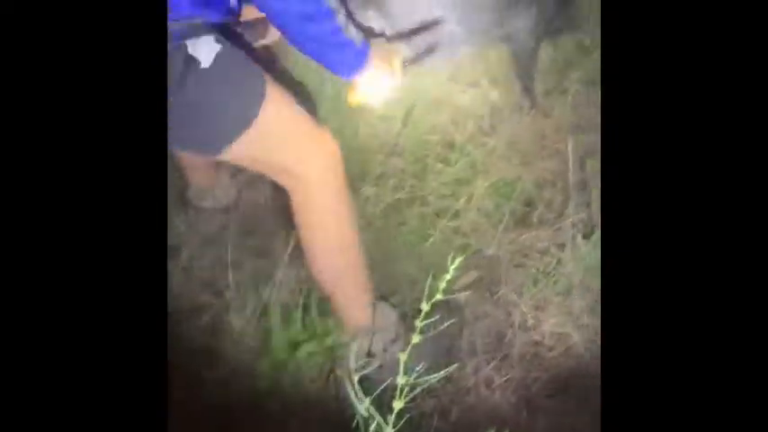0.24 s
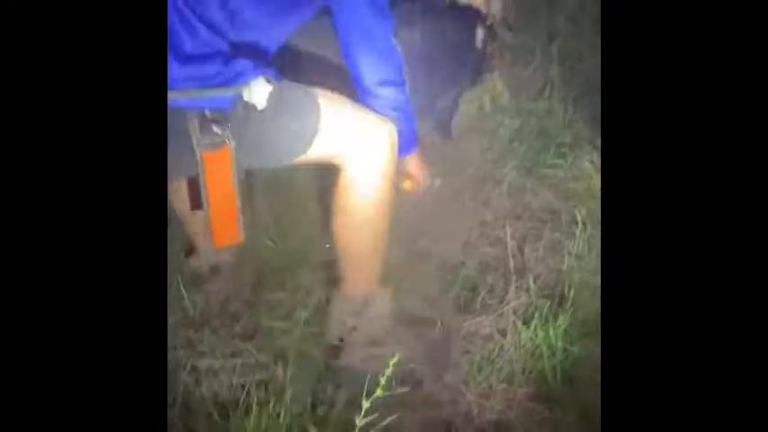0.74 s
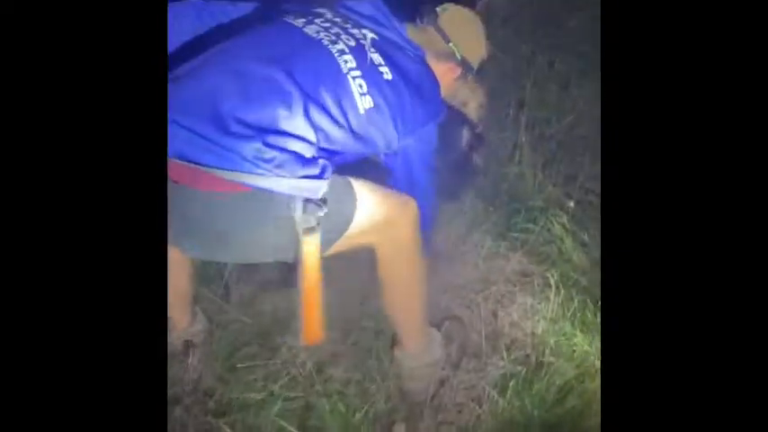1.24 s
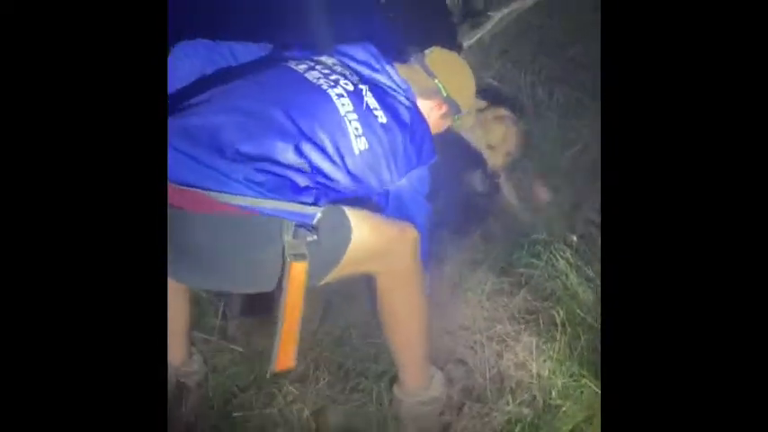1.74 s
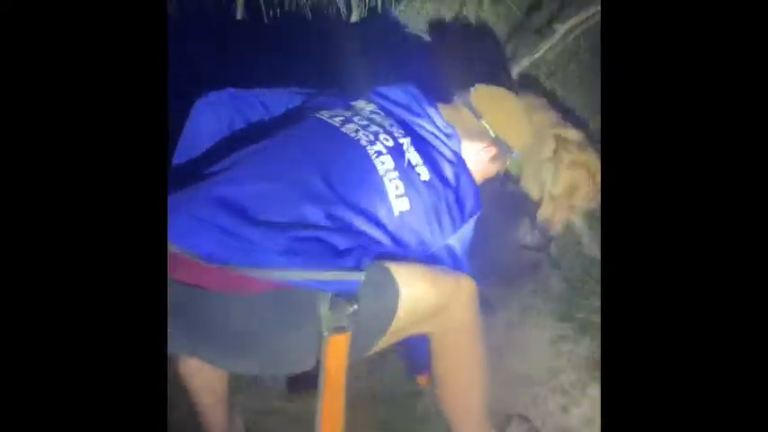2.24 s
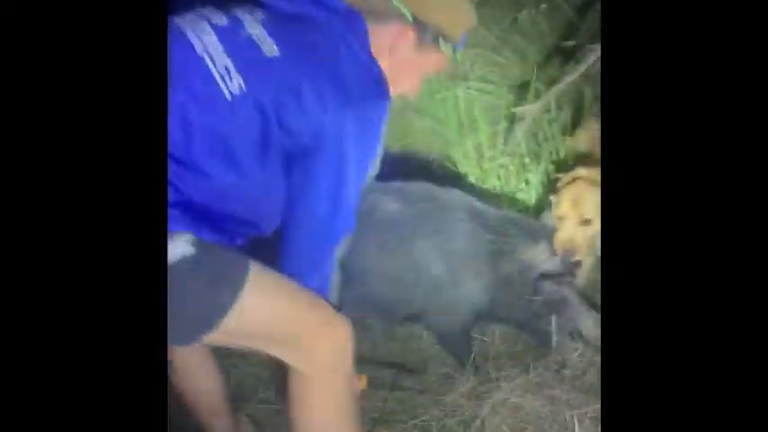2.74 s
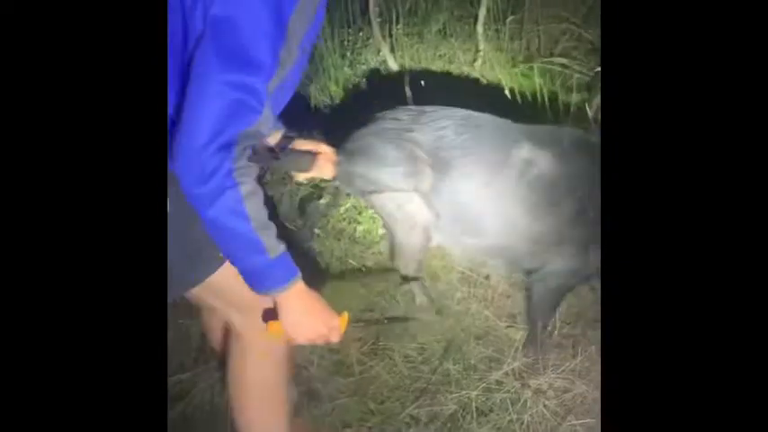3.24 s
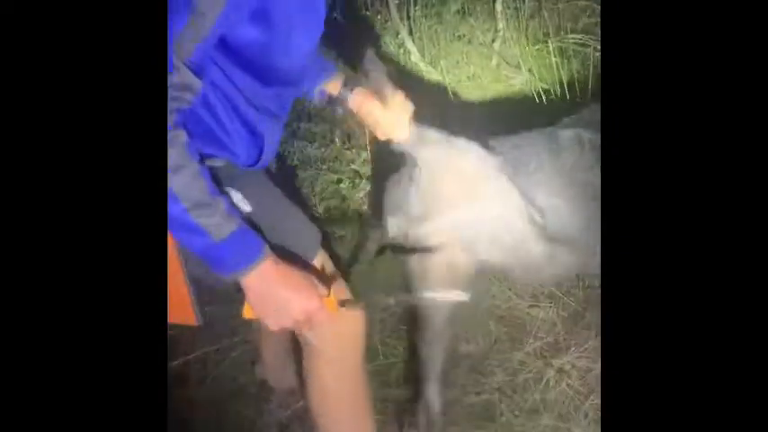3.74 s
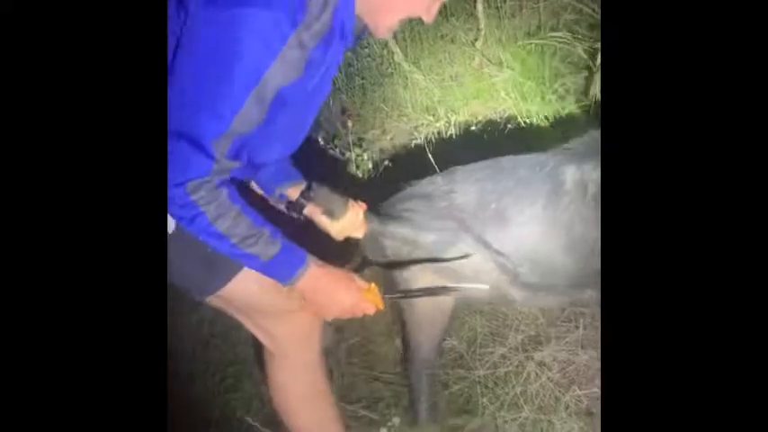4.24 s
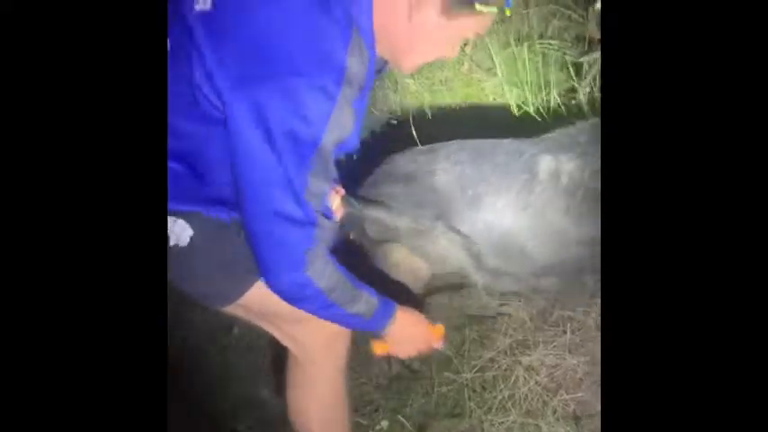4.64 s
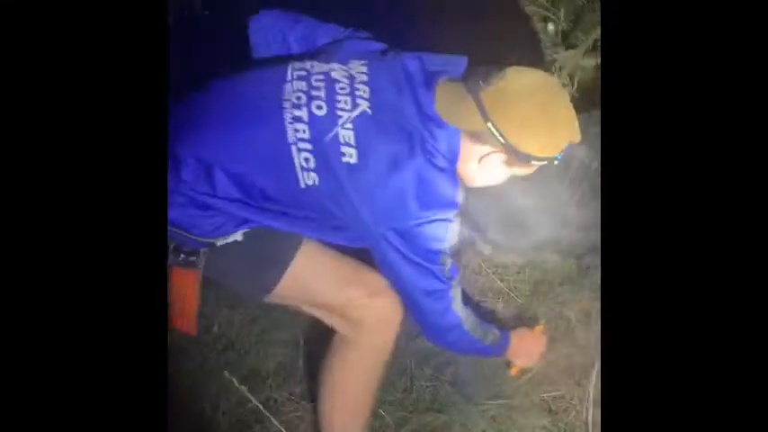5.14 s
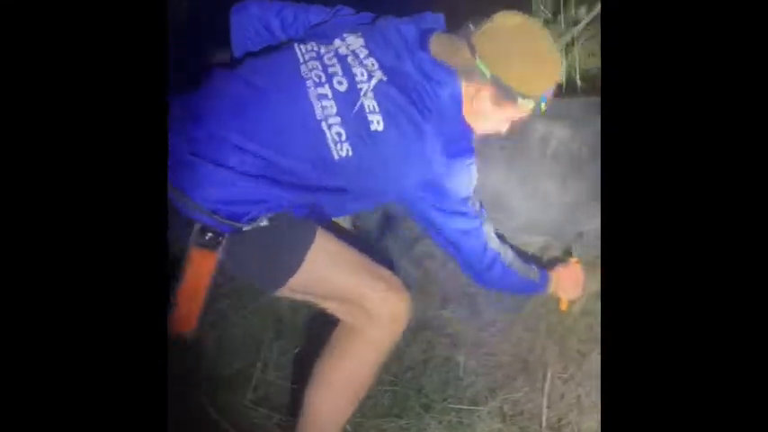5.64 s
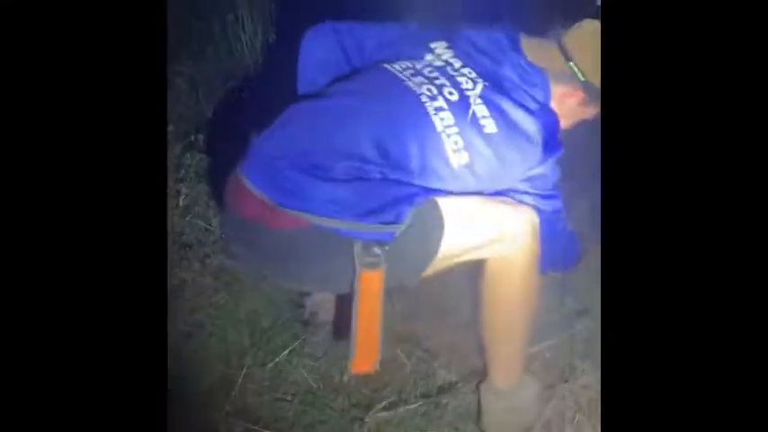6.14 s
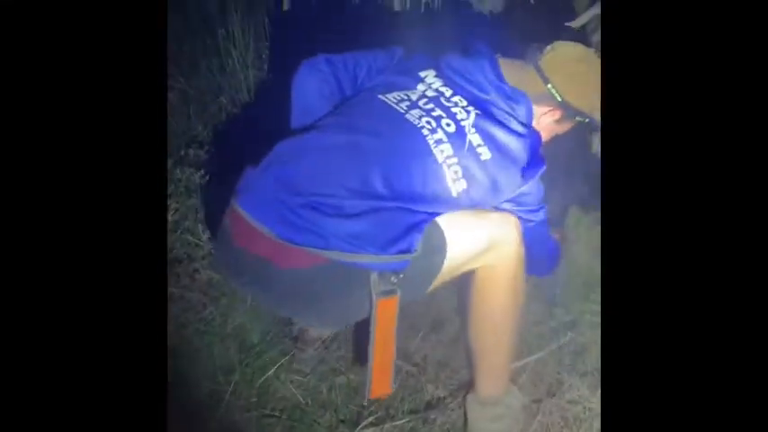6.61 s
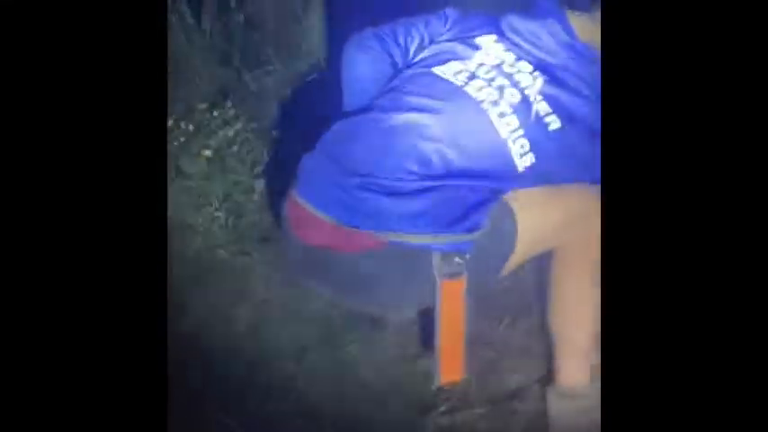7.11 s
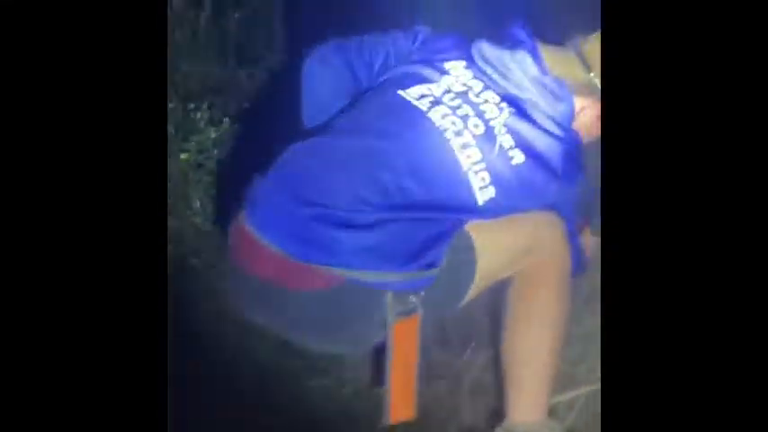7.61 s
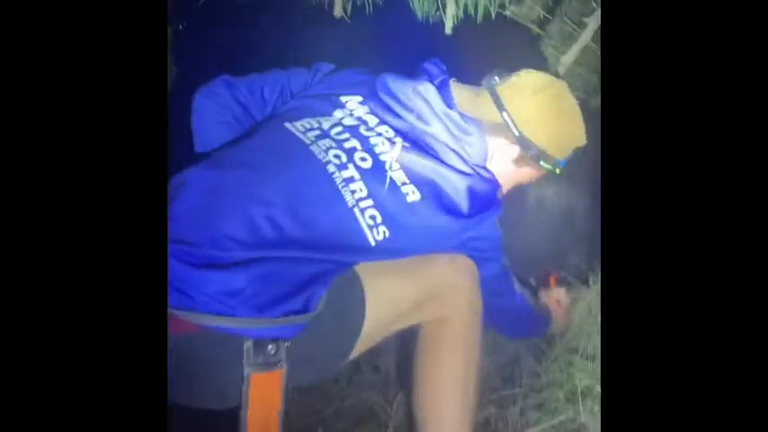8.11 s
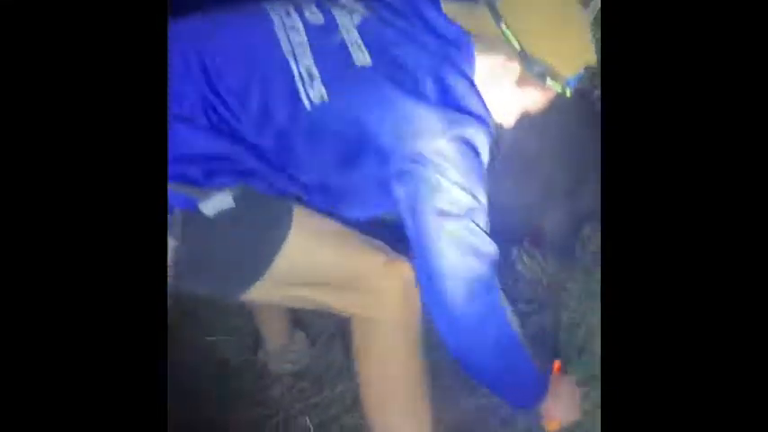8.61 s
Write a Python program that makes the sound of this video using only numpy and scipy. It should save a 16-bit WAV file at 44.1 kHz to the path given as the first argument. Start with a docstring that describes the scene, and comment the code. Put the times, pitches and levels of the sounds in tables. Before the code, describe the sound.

Close, dry outdoor sound on a still night, with a very faint hush behind. From 0 to 2.4 s a wild pig grunts in irregular quick runs, each grunt a few hard throat flaps, with slack rattles, raspy air and low rumble around them; a thin rising moan slips in near 0.8 s. At 2.45 s it breaks into a rough, whistling scream of about 0.6 s, dipping and climbing, ending in a short yelp near 3.15 s. Grunts resume from 3.3 to 5.4 s, with small moans at 3.75 and 4.6 s and faint dry stalk snaps at 4.4 and 5.1 s. A long scream runs 5.4 to 7.7 s, growling at first, then high, piercing and torn, over faint dull thumps, dropping suddenly in pitch at the end. A soft breath hiss follows, then grunts at 8.0, 8.2, 8.4 and 8.8 s, with another hiss near 8.7 s.

```python
"""Runs of rattling grunts from a wild pig, held by a dog in a paddock at night, a few steps away.
Slow flaps of the vocal folds ring its throat; slack folds rattle between and after the grunts.
Twice it breaks into a scream, the first ending in a yelp: a high whistle riding on fast, rough fold pulses.
Air rasps and rumbles with the grunts. Thin moans, soft hisses, dull thumps and snapping stalks
stand over the hush of a still night, made of shaped noise. The dog itself makes no sound."""
import sys
import numpy as np
from scipy import signal
from scipy.fft import rfft, irfft, next_fast_len
from scipy.io import wavfile
from scipy.ndimage import uniform_filter1d

SR = 44100
rng = np.random.default_rng(int(sys.argv[2]) if len(sys.argv) > 2 else 0)


def store_wav(level_fs):
    """Save 16-bit WAV to argv[1]."""
    pcm = np.round(np.clip(np.atleast_2d(level_fs), -1, 1) * 32767)
    wavfile.write(sys.argv[1], SR, pcm.T.astype(np.int16))


N = 390726
TIME = np.arange(N) / SR

# grunts: start_s, flap_gap_s, flaps (count before rounding), crest (strongest flap, counted from 0),
# level_db (before the grunt gain), pharynx_hz (centre of a small scatter), pharynx_db (relative),
# mouth_hz (at the crest), upper_mouth_db (added to the third throat mode)
GRUNT_ROWS = [(0.082, .0203, 2.8, .8, -14.5, 542.2, -6.5, 1607, -4),
              (.231, .0195, 4, 1.8, -14, 583, -1.5, 1531, -1),
              (.658, .0252, 4, 1, -17, 499.2, -13, 1497, -9.5),
              (0.903, .025, 2.2, 1, -17, 564.4, -12, 1517, -6.5),
              (1.076, .024, 4.1, 1.5, -16.5, 561, -4.5, 1710, -9.5),
              (1.506, .0235, 3, 1.4, -12, 523.7, -8.5, 1481, 6),
              (1.649, .0235, 1.8, .6, -11, 590.3, -2.5, 1472, 4.5),
              (1.691, .011, 2.7, 1, -11.5, 578.2, -6.5, 1514, 14.5),
              (1.873, .022, 4, 1, -13.5, 567, 6.5, 1614, 10.5),
              (2.046, 0.019, 2.8, 0, -26, 589.8, 8.5, 1490, -3.5),
              (2.365, .0222, 5, 1, -10.5, 515, 5, 1596, 7.5),
              (3.271, 0.0215, 2.4, 1, -16.5, 624.6, 9, 1448, 14.5),
              (3.646, .0215, 4, 2, -13.5, 492.6, -9.5, 1514, -5),
              (3.839, .023, 2, 1, -21.5, 583, -10, 1171, 11.5),
              (3.984, .022, 4, 1.6, -12.5, 587.3, -6.5, 1421, -1),
              (4.487, .0268, 3, 1.4, -11.5, 478.4, -11.5, 1490, -15.5),
              (4.740, .0252, 3, .8, -12.5, 536.7, -8.5, 1679, 1),
              (4.921, .024, 2.6, 1.3, -12, 585, -5.5, 1411, 4),
              (5.307, .0236, 5, 1.6, -9.5, 467.4, -2.5, 1586, 6),
              (8.026, .0235, 4, 1.8, -14.5, 480.5, 8, 1478, -6.5),
              (8.228, 0.023, 3.5, .9, -17.5, 506.4, 7.5, 1547, 9),
              (8.402, .022, 1.6, .5, -15.5, 518, -3.5, 1382, 2),
              (8.795, .022, 3, 1.4, -10.5, 467.7, -5.5, 1558, -8.5)]
# throat modes above the pharynx: mode_hz (with the mouth tuned to the second row), level_db (relative),
# t60_s (in a grunt)
THROAT_MODES = [(948.4, -20, 0.051), (1518.4, 3.5, 0.0268), (2128, -3.5, 0.0097), (3040, -12, 0.0099),
                (3571, -18, 0.013), (6020, -42, 0.0067)]
# spectrum of low rumble, in the chest or the ground: freq_hz, density_db (relative, per Hz)
RUMBLE_SPECTRUM = [(20, -35.5), (50, -14), (85, 1), (130, -10), (220, -11), (400, -23), (1000, -72)]
# a flap carries no deep bass
FLAP_LOW_CUT = signal.butter(1, 130, "high", fs=SR)


def from_db(db):
    """Decibels to gain."""
    return 10 ** (np.asarray(db) / 20)


def rms_one(x):
    """Scale to unit rms."""
    return x / np.sqrt(np.mean(x ** 2) + 1e-20)


def read(rows, t):
    """Each column of a curve at the times t."""
    s, *columns = np.transpose(rows)
    return [np.interp(t, s, c) for c in columns]


def at_hz(points, hz, axis=1):
    """One column of a table over log frequency."""
    table = np.array(points)
    return np.interp(np.log(hz), np.log(table[:, 0]), table[:, axis])


def shaped(x, spectrum):
    """Pass x through a spectrum; unit rms."""
    size = next_fast_len(len(x))
    hz = np.maximum(np.arange(size // 2 + 1) * SR / size, 1)
    gain = from_db(at_hz(spectrum, hz))
    return rms_one(irfft(rfft(x, size) * gain, size)[:len(x)])


def wander(t, rate):
    """Random motion of unit rms through rate random points a second."""
    steps = (t - t[0]) * rate
    return rms_one(np.interp(steps, np.arange(2048), rng.standard_normal(2048)))


def evened(x, window_s=0.035):
    """Hold the running level at one."""
    power = np.abs(uniform_filter1d(x ** 2, max(int(window_s * SR), 1)))
    return x / np.sqrt(power + 1e-6)


def gate(rows, t, fade_s=0.0026):
    """One while a curve lasts, with short fades."""
    inside = np.minimum(t - rows[0][0], rows[-1][0] - t)
    return np.clip(inside / fade_s + 1, 0, 1)


def swell(t, middle, length):
    """A smooth hump of height one."""
    return np.cos(np.pi * np.clip((t - middle) / length, -.5, .5))


def ring(push, hz, t60):
    """A resonance: a unit click sets a sine ringing from height one, dying by 60 dB in t60 seconds."""
    r, w = from_db(-60 / (t60 * SR)), 2 * np.pi * hz / SR
    return signal.lfilter([0, np.sin(w)], [1, -2 * r * np.cos(w), r * r], push)


def add(out, start_s, x):
    """Mix x in from a given time."""
    i = max(int(start_s * SR), 0)
    out[i:i + len(x)] += x[:max(N - i, 0)]


def night(level_db=-59.5):
    """The faint hush of the open paddock: shaped noise with a slight drift in level."""
    # hush: freq_hz, density_db (relative, per Hz)
    hush_spectrum = [(20, -17), (55, 4.5), (270, -19.5), (550, -11), (900, -17.5), (1600, -11.5),
                     (2500, -20), (3500, -19.5), (5000, -30), (8000, -49.5)]
    drift = from_db(2 * wander(TIME, 6))
    return from_db(level_db) * drift * shaped(rng.standard_normal(N), hush_spectrum)


def thumps():
    """Weight lands dully on soft ground in the struggle: humps of low rumble."""
    # thumps: middle_s, length_s, level_db (rms at the top of the hump)
    landings = [(5.818, 0.029, -44.5), (6.739, 0.089, -56), (6.988, 0.167, -56)]
    envelope = sum(from_db(db) * swell(TIME, middle, length) for middle, length, db in landings)
    return envelope * shaped(rng.standard_normal(N), RUMBLE_SPECTRUM)


def ticks(ring_hz=3500, snap_s=0.002):
    """Dry stalks snap faintly underfoot: a burst of noise rings a short resonance."""
    # snaps: start_s, peak_db
    snaps = [(4.42, -44), (5.075, -42)]
    out, t = np.zeros(N), TIME[:SR // 20]
    for start, db in snaps:
        burst = rng.standard_normal(len(t)) * np.exp(-t / snap_s)
        snap = ring(burst, ring_hz, snap_s / 2)
        add(out, start, from_db(db) * snap / np.abs(snap).max())
    return out


def hisses():
    """With the folds apart, air only hisses through the throat modes and the open mouth."""
    # hisses: middle_s, length_s, level_db (rms at the top of the hump)
    breaths = [(7.768, 0.401, -55), (8.734, 0.278, -49.5)]
    flow = sum(from_db(db) * swell(TIME, middle, length) for middle, length, db in breaths)
    push = rng.standard_normal(N)
    modes = [(-1) ** k * from_db(db) * rms_one(ring(push, hz, t60 / 2))   # open folds damp the modes
             for k, (hz, db, t60) in enumerate(THROAT_MODES)]
    return flow * rms_one(sum(modes))


def air(voice, rasp_db=-15, rumble_db=-11, linger_s=0.0344, rasp_lag_s=0.012, rumble_lag_s=0.012):
    """The air that drives the folds rasps in the throat and rumbles in the chest, just behind the voice."""
    # rasp: freq_hz, density_db (relative, per Hz)
    rasp_spectrum = [(150, -9.5), (580, 18), (780, 7.5), (1800, 2.5), (2500, 3.5), (3400, -6), (4800, -4),
                     (7000, -27.5), (10000, -57)]
    window = signal.windows.hann(int(2 * linger_s * SR))
    power = signal.fftconvolve(voice ** 2, window / window.sum(), "same")
    flow = np.minimum(np.sqrt(np.abs(power)), from_db(-36.0))   # the throat passes only so much air
    rasp_flow = from_db(rasp_db) * np.interp(TIME - rasp_lag_s, TIME, flow)
    rasp = rasp_flow * shaped(rng.standard_normal(N), rasp_spectrum)
    rumble_flow = from_db(rumble_db) * np.interp(TIME - rumble_lag_s, TIME, flow)
    rumble = rumble_flow * shaped(rng.standard_normal(N), RUMBLE_SPECTRUM)
    return rasp + rumble


def moans(gain_db=0, fold_hz=440, side_db=-13, jitter=.032, flutter_db=6):
    """A thin, rising, fluttering whistle, with a side tone a fold rate above and below."""
    # moans, between grunts or under a scream: middle_s, length_s, level_db, pitch_hz (mid-moan), glide_hz_per_s
    moan_rows = [(0.026, 0.2094, -48.5, 1185, 2558), (0.783, 0.1936, -36, 1462, 1926),
                 (2.905, 0.15, -31.5, 1429, 700), (3.755, 0.159, -38.5, 1623, 2810),
                 (4.62, 0.14, -39, 1601, 1966), (5.896, 0.1407, -20.5, 1581, 500.7)]
    out = np.zeros(N)
    for middle, length, db, hz, glide in moan_rows:
        t = middle + TIME[:int(length * SR)] - length / 2
        # stretched time, in seconds at the middle pitch
        warped = np.cumsum(1 + glide * (t - middle) / hz + jitter * wander(t, 250)) / SR
        tones = 0
        for k in (-1, 0, 1):
            phase = 2 * np.pi * (hz + k * fold_hz) * warped + wander(t, 60)
            tones = tones + from_db(side_db * abs(k)) * np.sin(phase)
        fluttering = rms_one(tones * from_db(flutter_db * wander(t, 150)))
        add(out, t[0], from_db(db + gain_db) * swell(t, middle, length) * fluttering)
    return out


def flap(pharynx_hz, pharynx_db, mouth_hz, dull_db=0, upper_db=0, pharynx_t60=0.076,
         puff=0.0652, puff_s=0.005604, scatter_db=2.5,
         chest_hz=250, chest_db=-17, chest_t60=0.0083, soft_hz=5800):
    """The folds slap shut and let a puff of air through; pharynx, chest and throat modes ring; peak one."""
    # the mouth's ring builds up, starting sharp by a share and sagging back
    rise_s, sharp, sag_s = .0006, .07, .004
    mouth_mode_hz = THROAT_MODES[1][0]
    t = TIME[:SR // 16]
    push = puff * rng.standard_normal(len(t)) * np.exp(-t / puff_s)
    push[0] += 1   # the slap
    push = signal.lfilter(*signal.butter(2, min(soft_hz, SR / 3), fs=SR), push)
    pharynx = ring(push, pharynx_hz * (1 + .02 * rng.normal()), pharynx_t60)
    chest = ring(push, chest_hz * np.exp(0.11 * rng.normal()), chest_t60)
    out = from_db(pharynx_db) * pharynx / np.abs(pharynx).max()
    out += from_db(chest_db) * chest / np.abs(chest).max()
    for k, (hz, db, t60) in enumerate(THROAT_MODES):
        # the jaw moves the low modes most
        moved = hz * (mouth_hz / mouth_mode_hz) ** min(mouth_mode_hz / hz, 1) ** 2
        mode = ring(push, moved * (1 + .02 * rng.normal()), t60)
        if k == 1:
            early = t + sharp * sag_s * (1 - np.exp(-t / sag_s))
            mode = np.interp(early, t, mode) * (1 - np.exp(-t / rise_s))
        dulling_db = dull_db * max(np.log2(hz / mouth_mode_hz), 0)
        level_db = db + upper_db * (k == 2) - dulling_db + scatter_db * rng.normal()
        out += (-1) ** (k + 1) * from_db(level_db) * mode / np.abs(mode).max()
    out = signal.lfilter(*FLAP_LOW_CUT, out)
    return out / np.abs(out).max()


def trailing_rattles(mouth_hz=1560, throat_db=-8):
    """The rattle after each grunt, weaker when the grunt is throaty; rows laid out like the snarls."""
    # grunts closer than this make a run: a rattle links them, and a short, softer one trails the last
    run_gap_s = .3
    # level against its grunt; wait after the next-to-last flap; dB lost per dB of pharynx
    rattle_db, delay_s, muffle = -32.5, .012, 0.41
    last_length_s, last_db = .075, -4.5
    rows = []
    next_starts = [row[0] for row in GRUNT_ROWS[1:]] + [np.inf]
    for (start, gap, flaps, _, db, _, pharynx_db, _, _), next_start in zip(GRUNT_ROWS, next_starts):
        last = next_start - start > run_gap_s
        begin = start + (flaps - 2) * gap + delay_s
        length = last_length_s if last else next_start - begin
        level = db + rattle_db - muffle * pharynx_db + last * last_db
        rows.append((begin + length / 2, max(length, gap), level, mouth_hz, throat_db))
    return rows


def rattles(gain_db=2, flaps_per_s=130, uneven_db=7.0, pharynx_hz=620, chest_below_db=-5,
            jaw_rise=0.051, bright_per_db=0.9941, bright_from_db=-38):
    """Slack folds flutter in quick, uneven, airy flaps while the jaw opens again."""
    # snarls, rattles that stand by themselves: middle_s, length_s, level_db (before gain_db),
    # mouth_hz (centre of a scatter), pharynx_db (relative)
    snarls = [(0.032, 0.135, -39.5, 1120, -8.5), (1.733, 0.0644, -27, 1763, -0.5),
              (1.82, 0.1113, -38, 1785, 2), (1.986, 0.162, -39.5, 1735, -5), (3.236, .1, -44, 1360, 0.5),
              (3.784, 0.0716, -36, 1709, -25)]
    out = np.zeros(N)
    for middle, length, db, mouth_hz, pharynx_db in trailing_rattles() + snarls:
        # a harder push flutters faster, and brighter
        count = int(length * flaps_per_s * from_db((db + 41.5) / 2)) + 1
        dull_db = -bright_per_db * max(db - bright_from_db, 0)
        train = np.zeros(N)
        places = (np.arange(count) + rng.random(count)) / count - .5   # -0.5 to 0.5 along the rattle
        for place in places:
            size = np.cos(np.pi * place) * from_db(uneven_db * rng.normal())
            opening = mouth_hz * (1 + jaw_rise * place + 0.0681 * rng.normal())
            throat_hz = pharynx_hz * np.exp(0.15 * rng.normal())
            one_flap = flap(throat_hz, pharynx_db, opening, dull_db, puff=0.32,
                            pharynx_t60=0.076, chest_db=pharynx_db + chest_below_db)
            add(train, middle + place * length, size * one_flap)
        out += from_db(db + gain_db) * train * np.sqrt(length * SR / 2 / np.sum(train ** 2))
    return out


def grunts(gain_db=-1.0, jaw_fall=0.019, first_stir_db=-26):
    """Each grunt is a short train of flaps that swells and fades while the jaw closes."""
    swell_db, fade_db = 3.5, 8   # rise per flap up to the crest; fall from there to the last flap
    out = np.zeros(N)
    for start, gap, flaps, crest, db, pharynx_hz, pharynx_db, mouth_hz, upper_db in GRUNT_ROWS:
        count = int(round(flaps))
        # the folds stir softly one beat before they first shut
        stir = flap(pharynx_hz, pharynx_db + 6, mouth_hz)
        add(out, start - gap, from_db(db + first_stir_db) * stir)
        for k in range(count):
            rise = swell_db * max(crest - k, 0)
            fall = fade_db * max(k - crest, 0) / max(count - 1 - crest, 1)
            jaw_hz = mouth_hz * (1 - jaw_fall * (k - crest))
            one_flap = flap(pharynx_hz, pharynx_db, jaw_hz, upper_db=upper_db)
            add(out, start + k * gap, from_db(db + gain_db - rise - fall) * one_flap)
    return out


def throat_state(t, row, pitch, levels, waver_db=3.5, drift=0.003974):
    """Fold rate and pharynx follow from the pitch and the levels; the throat starts slack and tightens."""
    tighten_s, slack_rough = 0.068, .1   # time taken to tighten; roughness added by a slack throat
    fold_reference_hz = 2000   # whistle pitch at which the folds run at their listed rate
    pharynx_follows, usual_voice_db = 0.73, -25   # dB per dB of voice above its usual level
    break_s, before_hz, after_hz, follow, _, _, _, _, pharynx_db, _, slack_s, tight_rough = row
    hz = read(pitch, t)[0] * (1 + drift * wander(t, 14))
    whistle_db, voice_db, bright_db, octave_db = read(levels, t)
    slack = np.clip(.5 - (t - levels[0][0] - slack_s) / tighten_s, 0, 1)
    rough = np.clip(tight_rough + slack_rough * slack, 0, 1)
    fold_hz = np.where(t < break_s, before_hz, after_hz) * (hz / fold_reference_hz) ** follow
    low_db = pharynx_db + pharynx_follows * (voice_db - usual_voice_db)
    whistle_db = whistle_db + waver_db * wander(t, 14)
    return hz, whistle_db, octave_db, voice_db, fold_hz, rough, slack, low_db, bright_db


def stutter(t, slack):
    """Slack folds clap shut at an uneven rate and chop the voice into pulses."""
    rate_hz, uneven, depth = 130, .3, .4
    claps = np.cumsum(rate_hz * np.exp(uneven * wander(t, rate_hz))) / SR
    return 1 + slack * depth * (.5 - 2 * np.cos(np.pi * claps) ** 4)


def growl(t, push, hz, jitter=.01, flutter_db=2, second_db=-13, chest_hz=330, chest_db=-12,
          chest_t60=0.05, gargle_hz=780, gargle_db=-9, gargle_t60=0.012):
    """The slack pharynx sings a hoarse, gliding note and its octave; air gargles in the throat and chest."""
    phase = 2 * np.pi * np.cumsum(hz * (1 + jitter * wander(t, 300))) / SR
    note = np.sin(phase) + from_db(second_db) * np.sin(2 * phase)
    note = note * from_db(flutter_db * wander(t, 130))
    push = signal.lfilter(*FLAP_LOW_CUT, push)
    chest = from_db(chest_db) * evened(rms_one(ring(push, chest_hz, chest_t60)))
    gargle = from_db(gargle_db) * evened(rms_one(ring(push, gargle_hz, gargle_t60)))
    return rms_one(note) + chest + gargle


def scream(row, pitch, levels, whistle_jitter=0.0046, fold_jitter=0.05, shimmer_db=1.8, third_db=-19,
           pharynx_db=2.5, edge_db=3.5, octave_gain_db=3.0, octave_chop=0.38, lower_side_db=-33,
           spray_db=-12, spray_db_per_octave=16, hiss_share=1.0):
    """A whistle chopped by the folds sprouts side tones a fold rate apart; under strain they tear into noise."""
    # the throat wide open, in zones from pharynx through mouth to edge, then its spray of treble,
    # and the mouth still half shut: each freq_hz, density_db (relative, per Hz)
    pharynx_zone = [(60, -52.5), (180, -21), (330, -23), (480, 1), (620, 12.5), (800, -3.5), (1200, -41),
                    (2000, -84)]
    mouth_zone = [(600, -71), (950, -28), (1200, -9.5), (1530, 7), (1850, -3), (2100, -10.5), (2400, -15),
                  (3500, -48)]
    edge_zone = [(1500, -30), (2300, -3.5), (2750, -1), (3300, -15.5), (4000, -17), (4700, -12.5),
                 (5800, -33), (9000, -62.5)]
    spray_zone = [(3500, -14.5), (5000, 11), (5900, 0), (7200, 3.5), (8500, -7.5), (11000, -2.5),
                  (16000, -30)]
    half_shut_zone = [(900, -49.5), (1250, -21.5), (1550, 6), (1800, -1.5), (2050, 3.5), (2400, -22),
                      (3500, -57.5)]
    opening_s = 0.695   # the mouth opens fully over the start of a scream
    t = TIME[int((levels[0][0] - .01) * SR):int((levels[-1][0] + .01) * SR)]
    state = throat_state(t, row, pitch, levels)
    hz, whistle_db, octave_db, voice_db, fold_hz, rough, slack, low_db, bright_db = state
    growl_hz, growl_glide, growl_db, growl_swell, _, side_db, slack_s, _ = row[4:]

    # running phases of whistle and folds
    whistle_shake = whistle_jitter * (.5 + rough) * wander(t, 260) + .005 * wander(t, 25)
    whistle = 2 * np.pi * np.cumsum(hz * (1 + whistle_shake)) / SR
    fold_shake = rough * (fold_jitter * wander(t, 300) + 0.06 * wander(t, 24))
    folds = 2 * np.pi * np.cumsum(fold_hz * (1 + fold_shake)) / SR

    sides = 0
    for k in np.setdiff1d(np.arange(-8, 25), 0):
        # each side tone swells and slips on its own
        tone_swell = from_db(6 * rough * wander(t, 35))
        torn = tone_swell * np.cos(whistle + k * folds + 1.65 * rough * wander(t, 110))
        sides = sides + torn * (hz + k * fold_hz > 100)
    hiss = rng.standard_normal(len(t)) * (1 + 0.39 * np.cos(folds))
    source = np.sqrt(1 - rough ** 2) * rms_one(sides) + hiss_share * rough * hiss

    # a tighter throat sprays more treble
    treble_db = bright_db + spray_db + spray_db_per_octave * np.log2(hz / 2200)
    zones = [(pharynx_zone, low_db + pharynx_db), (edge_zone, bright_db + edge_db), (spray_zone, treble_db)]
    voice = sum(from_db(db) * evened(shaped(source, zone)) for zone, db in zones)
    opened = np.clip((t - t[0]) / opening_s, 0, 1) ** 2
    mouth = (1 - opened) * shaped(source, half_shut_zone) + opened * shaped(source, mouth_zone)

    # as the whistle drowns in the voice, the side tone just below it holds on in its place
    drowned = np.clip((voice_db - whistle_db) / 10, 0, 1)
    passed = from_db(np.minimum(at_hz(mouth_zone, hz - fold_hz), 0))   # the mouth damps it when it falls low
    lower_gain = from_db(np.minimum(voice_db, lower_side_db) + 4 * wander(t, 13))
    lower = drowned * passed * lower_gain * np.sin(whistle - folds + rough * wander(t, 110))
    voice = voice + from_db(voice_db) * evened(mouth) + np.sqrt(2) * lower

    # the growl glides and swells until the throat tightens
    age = np.minimum(t - t[0], slack_s)
    groan = from_db(growl_db + growl_swell * age) * slack * growl(t, hiss, growl_hz + growl_glide * age)

    # once the throat is tight, the two side tones just above the whistle stand out
    upper = 0
    for k in (1, 2):
        upper = upper + from_db(k * side_db) / k * np.sin(whistle + k * folds + rough * wander(t, 110))
    upper = (1 - slack) ** 4 * upper
    tone = from_db(whistle_db) * (np.sin(whistle + 1.5 * drowned * wander(t, 150)) + upper)

    # the overtones slip less in phase the higher the whistle; the folds sway them
    slip = .3 * (2200 / hz) ** 3 * wander(t, 400)
    slip = slip + octave_chop * (1 - drowned) * np.sin(folds)
    overtone_gain = from_db(octave_db + octave_gain_db + 2.73 * wander(t, 90))
    third = from_db(third_db) * np.sin(3 * whistle + 2 * slip)
    overtones = overtone_gain * (np.sin(2 * whistle + slip) + third)

    strain = from_db(shimmer_db * rough * wander(t, 140)) * stutter(t, slack)
    strained = (voice + np.sqrt(2) * (tone + overtones)) * strain
    out = np.zeros(N)
    add(out, t[0], (groan + strained) * gate(levels, t))
    return out


def paddock(x, scatter_db=-25, scatter_t60=0.43):
    """A close reflection and a faint tail from the scrub, picked up by two spaced microphone ports."""
    # the microphone pair: freq_hz, left_minus_right_db, left_lead_rad
    port_curve = [(100, 0, 0), (250, 0, -.5), (450, -6, -1.4), (850, -7, -1.5), (1150, -7, .1),
                  (1880, -7, .3), (2240, -3, -1.6), (2500, -2, -4.2), (3400, 1, -5.3), (4400, 1, -4),
                  (7400, 0, .2), (15500, 0, 12.5)]
    # reflections from ground, bodies and scrub: delay_s, level_db (in the bass; treble is dulled)
    reflections = [(.011, -20)]
    fft_size = next_fast_len(N + SR)
    bins_hz = np.maximum(np.arange(fft_size // 2 + 1) * SR / fft_size, 1)
    t = TIME[:SR // 2]
    near = 1
    for delay_s, db in reflections:
        near = near + from_db(db) * np.exp(-2j * np.pi * bins_hz * delay_s) / (1 + 1j * bins_hz / 3000)
    halves = np.array([[.5], [-.5]])   # each port takes half of the difference
    lean = from_db(at_hz(port_curve, bins_hz)) ** halves
    turn = np.exp(1j * at_hz(port_curve, bins_hz, axis=2) * halves)
    ports = lean / np.sqrt(np.mean(lean ** 2, axis=0)) * turn
    tail = rng.standard_normal((2, len(t))) * from_db(-60 * t / scatter_t60)
    tail *= from_db(scatter_db) / np.sqrt(np.sum(tail ** 2) / 2)
    return irfft(rfft(x, fft_size) * (near * ports + rfft(tail, fft_size)), fft_size)[:, :N]


def scene():
    """The pig over the hush of the night."""
    # a scream, a short yelp and a long scream, each with one register break: break_s,
    # fold_before_hz, fold_after_hz (at the reference whistle pitch), follow (of the whistle by the folds, 0-1),
    # growl_hz (at the start), growl_glide_hz_per_s, growl_db (at the start), growl_swell_db_per_s,
    # pharynx_db (at the usual voice, before the zone gain), upper_side_db (against the whistle),
    # slack_s (to mid-tightening), roughness (0-1, once tight)
    scream_rows = [(2.564, 169.6, 280.8, 0.13, 648.4, -1400, -31.5, 9, -52.5, -6, 0.11, .68),
                   (3.158, 172.7, 158.8, 0.6, 650, -500, -36, -65, -36, -16, 0.13, .75),
                   (5.819, 333.2, 284, 1, 441.6, 481, -36.5, 65, -43, -18, 0.1314, .68)]
    # whistle pitch in each, before drift and jitter: time_s, whistle_hz
    pitch_curves = [
        [(2.445, 1759), (2.54, 1515), (2.56, 1630), (2.605, 1620), (2.64, 1120), (2.735, 1595), (2.78, 1664),
         (2.86, 1912), (2.915, 2000), (2.94, 1943), (3.01, 2087), (3.05, 1850), (3.076, 1477)],
        [(3.11, 1401), (3.157, 1458)],
        [(5.405, 1594), (5.5, 1629), (5.535, 1849), (5.58, 2061), (5.81, 2200), (5.85, 2107), (6.21, 2138),
         (6.29, 2227), (6.65, 2193), (6.83, 2229), (7.0, 2184), (7.13, 2208), (7.4, 2158), (7.53, 2210),
         (7.655, 2142), (7.685, 1963), (7.715, 1395)],
    ]
    # levels in each, before gains and wavering: time_s, whistle_db, rough_voice_db, treble_db, octave_db
    level_curves = [
        [(2.445, -48.5, -47.5, -49, -69.5), (2.49, -35, -27.5, -25, -35.5), (2.52, -14.5, -20, -31.5, -37.5),
         (2.551, -9, -27, -36, -31.5), (2.572, -29.5, -30, -43, -49), (2.62, -34.5, -28.5, -37.5, -47.5),
         (2.67, -38, -31, -34.5, -47.5), (2.77, -26, -28.5, -42.5, -46), (3.06, -29.5, -32.5, -43.5, -51.5),
         (3.075, -22, -28, -40, -57), (3.095, -35.5, -40, -50.5, -66.5)],
        [(3.095, -41, -46.5, -64.5, -63.5), (3.157, -16.5, -27, -33, -54.5), (3.2, -51.5, -52.5, -59, -72)],
        [(5.405, -59.5, -30.5, -57, -63.5), (5.47, -39, -22.5, -38.5, -36.5), (5.505, -22, -23, -35.5, -33.5),
         (5.57, -15, -32, -39, -39.5), (5.76, -19.5, -24.5, -40.5, -43.5), (5.82, -20.5, -20.5, -30.5, -54),
         (5.9, -19.5, -20, -33.5, -44), (5.96, -23, -25, -41.5, -45.5), (6.12, -22.5, -25, -37.5, -50),
         (6.22, -39, -24.5, -37.5, -49), (6.29, -29.5, -26.5, -41.5, -39), (6.55, -40.5, -28.5, -41, -47.5),
         (6.8, -33.5, -28.5, -36.5, -48.5), (7.13, -43.5, -29, -37.5, -33), (7.24, -49, -27.5, -36.5, -39.5),
         (7.35, -45, -23.5, -37.5, -39.5), (7.57, -38, -26, -38, -41), (7.685, -19.5, -24, -40, -55.5),
         (7.725, -49, -48.5, -57.5, -72)],
    ]
    grunting = grunts() + rattles()
    screaming = sum(scream(row, pitch, levels)
                    for row, pitch, levels in zip(scream_rows, pitch_curves, level_curves))
    background = night() + thumps() + ticks()
    breath = air(grunting) + hisses()
    return paddock(background + breath + moans() + grunting + screaming)


def record(dry):
    """The loudest peaks are rounded off and the top is cut."""
    cutoff_hz = 15900
    held = dry / (1 + (dry / .92) ** 8) ** (1 / 8)
    return signal.sosfiltfilt(signal.ellip(10, .1, 70, cutoff_hz, fs=SR, output="sos"), held)


dry = scene()
out = record(dry)
store_wav(out)
```